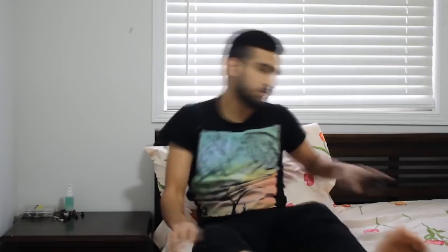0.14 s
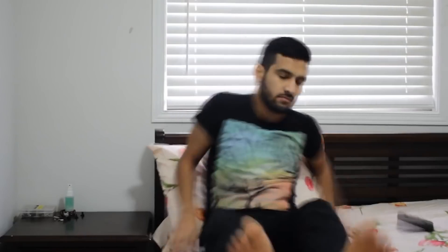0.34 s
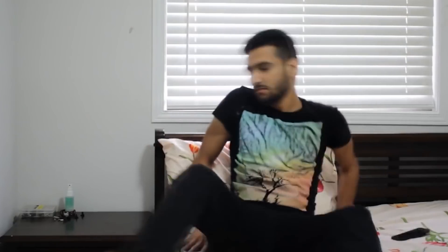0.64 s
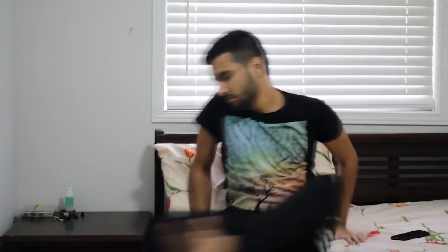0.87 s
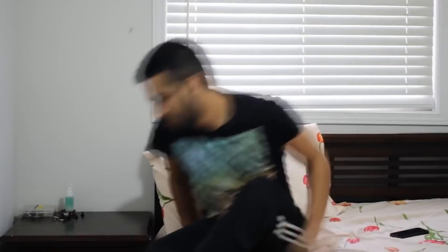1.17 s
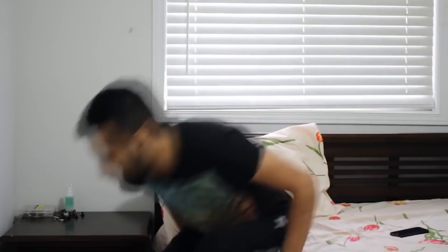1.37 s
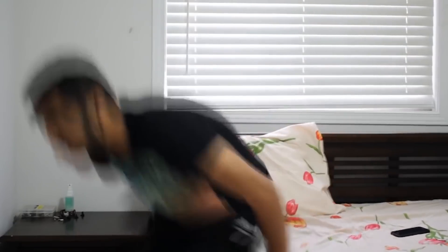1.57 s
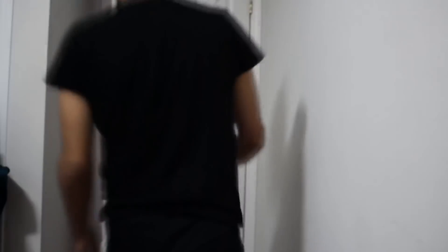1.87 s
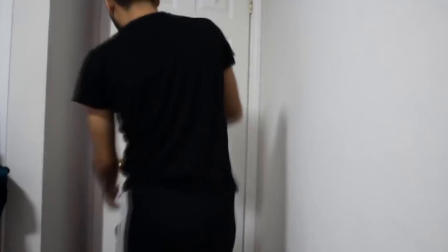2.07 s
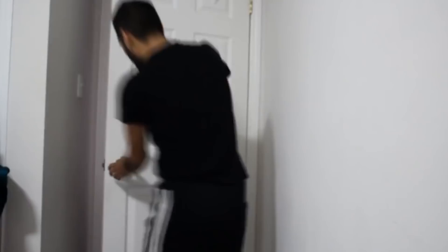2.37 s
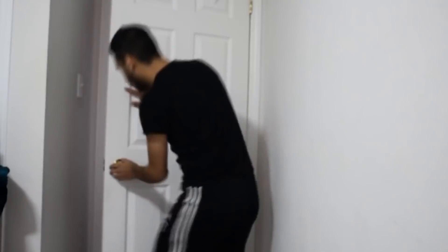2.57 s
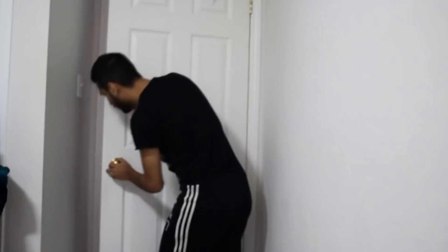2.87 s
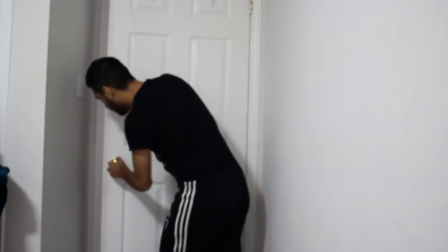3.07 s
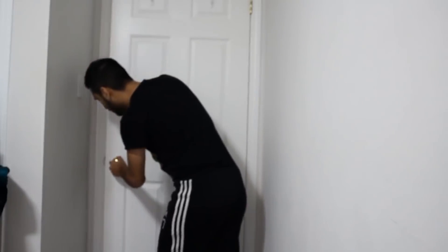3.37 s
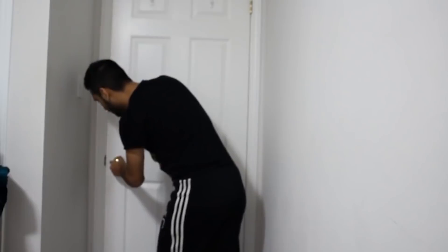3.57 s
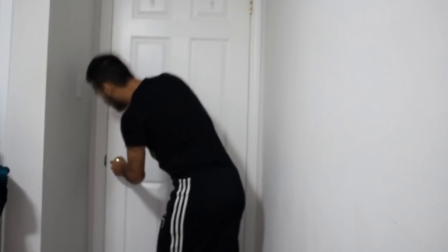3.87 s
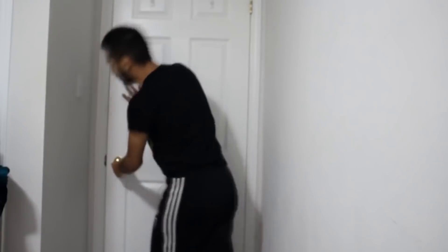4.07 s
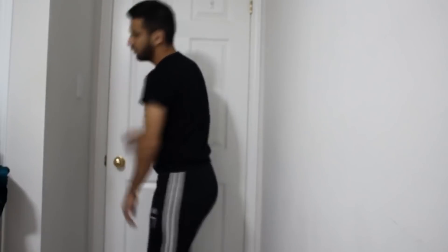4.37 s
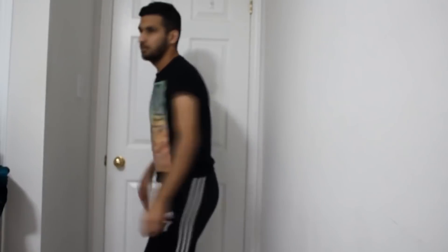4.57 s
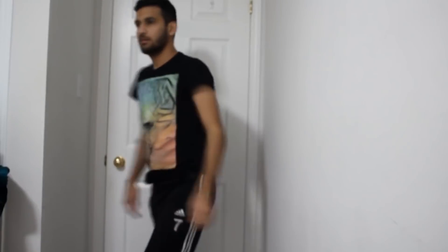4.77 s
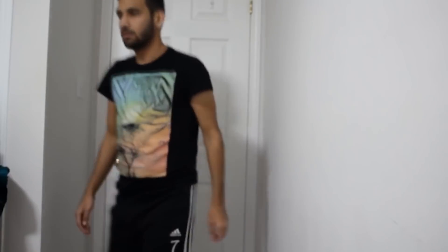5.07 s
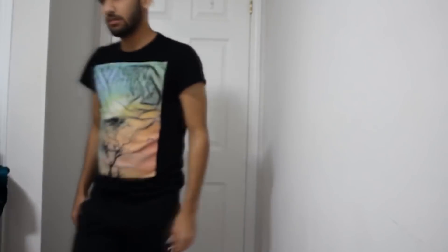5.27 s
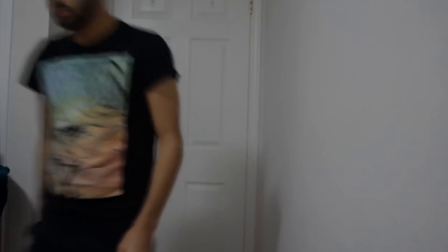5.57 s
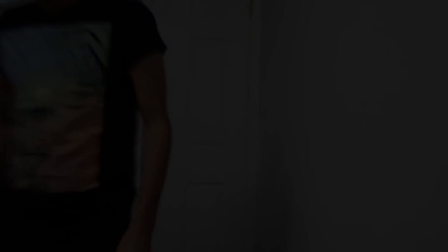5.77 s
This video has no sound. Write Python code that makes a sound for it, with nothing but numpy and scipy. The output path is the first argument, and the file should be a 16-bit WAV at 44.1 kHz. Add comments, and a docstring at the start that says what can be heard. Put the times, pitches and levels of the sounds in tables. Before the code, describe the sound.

Soft bed movements and a muffled bump come first, then a hurried rise with swishing clothes and low thuds of bare feet. A hollow wooden door taps its frame, a palm thuds on it and the bolt snaps. One loud, sharp bang follows, with metal chatter and short room reverberation. Feet scuff back past a creaking board, and a faint click closes it. Indoor, fairly close pickup.

```python
"""Cloth rustles in a quiet bedroom, then a dropped phone thuds on the bed: noise in grains, and noise-band blows.
Someone slides off the bedding (noise carried on a gliding pitch) and walks to a hollow wooden door.
The door is pushed to and the latch clacks; then the door bangs home and its hardware rattles (blows and ringing modes).
Bare feet scuff back across the floor, a board groans on one wavering note, and a light switch clicks."""
import sys
import numpy as np
from scipy import signal
from scipy.fft import rfft, irfft
from scipy.io import wavfile

SR = 44100
rng = np.random.default_rng(int(sys.argv[2]) if len(sys.argv) > 2 else 0)


def digitize_waveform(pressure):
    """Quantize a signal to 16-bit integers and store it at the path in sys.argv[1].

    Rows of a 2-D input are taken as channels; values are limited to [-1, 1].
    """
    field = np.atleast_2d(pressure).T
    bounded = np.clip(field, -1, 1)
    quanta = np.round(bounded * 32767).astype(np.int16)
    wavfile.write(sys.argv[1], SR, quanta)


N = 261858
TIME_S = np.arange(N) / SR
AFTER_S = TIME_S[:int(1.4 * SR)]  # time since a strike
EDGES_HZ = np.geomspace(20, 17000, 25)
CUTOFF_HZ = 15900


def from_db(db):
    """Decibels to gain."""
    return 10 ** (np.asarray(db) / 20)


def rms_one(x):
    """Scale to rms 1."""
    return x / np.sqrt(np.mean(x ** 2) + 1e-30)


def at_hz(points, hz):
    """Read a table on a log-frequency axis."""
    table = np.array(points)
    return np.interp(np.log(hz), np.log(table[:, 0]), table[:, 1])


def add(out, start_s, sound):
    """Mix a sound in at start_s."""
    start = int(start_s * SR)
    out[start:start + len(sound)] += sound[:N - start]


def drift(rate_hz):
    """Smooth chance: normal random knots, rate_hz per second, joined by lines."""
    knots = rng.standard_normal(4096)
    return np.interp(TIME_S * rate_hz, np.arange(len(knots)), knots)


def arch(start_s, length_s):
    """A stroke that rises from 0 to 1 and falls back."""
    return np.sin(np.pi * np.clip((TIME_S - start_s) / length_s, 0, 1))


def decay(t60_s):
    """Exponential fall of 60 dB in t60_s."""
    return np.exp(-np.log(1000) * AFTER_S / t60_s)


def ring(modes):
    """Struck modes: decaying sines, signs alternating."""
    out = 0
    for k, (hz, db, t60_s) in enumerate(modes):
        out = out + (-1) ** k * from_db(db) * decay(t60_s) * np.sin(2 * np.pi * hz * AFTER_S)
    return out


def noise(colour, grain_db, grain_rate_hz):
    """Coloured noise that comes in tiny bursts of uneven level; rms 1."""
    grains = rng.standard_normal(N) * from_db(grain_db * drift(grain_rate_hz))
    hz = np.maximum(np.fft.rfftfreq(N, 1 / SR), 1)
    octaves_below = np.maximum(np.log2(colour[0][0] / hz), 0)
    octaves_above = np.maximum(np.log2(hz / colour[-1][0]), 0)
    gain = from_db(at_hz(colour, hz) - 16 * (octaves_below + octaves_above))
    return rms_one(irfft(rfft(grains) * gain, N))


def bounce(sound, low_hz=600):
    """Nearby surfaces throw back mainly the treble."""
    return signal.sosfilt(signal.butter(2, low_hz, "high", fs=SR, output="sos"), sound)


# Bedroom decay. Each row: frequency in Hz, t60 in s.
ROOM = [(50, 2.17), (150, 0.74), (300, 0.64), (600, 0.53), (1300, 0.49), (3000, 0.35), (7000, 0.42),
        (15000, 0.23)]
# Each band: centre in Hz, width in Hz, filter.
BANDS = [(np.sqrt(lo * hi), hi - lo, signal.butter(2, [lo, hi], "band", fs=SR, output="sos"))
         for lo, hi in zip(EDGES_HZ, EDGES_HZ[1:])]


def blow(colour, attack_s, ring_t60_s, room_db, bass_db=0, treble_db=0):
    """Dense modes of a struck body die fast and the room holds each band longer; rms 1 over the first 50 ms."""
    out = 0
    body = (1 - np.exp(-AFTER_S / max(attack_s, 1e-4))) * decay(ring_t60_s)
    fed = np.cumsum(body ** 2) / np.sum(body ** 2)  # the room fills as the body gives up its energy
    for hz, width_hz, sos in BANDS:
        tail = from_db(room_db) * body.max() * decay(at_hz(ROOM, hz))
        envelope = np.sqrt(body ** 2 + fed * tail ** 2)
        band = signal.sosfilt(sos, rng.standard_normal(len(AFTER_S)) * envelope)
        bass_tilt_db = bass_db * np.clip(np.log2(500 / hz), 0, 3)
        treble_tilt_db = treble_db * np.clip(np.log2(hz / 600), 0, 3)
        band_db = at_hz(colour, hz) + bass_tilt_db + treble_tilt_db
        out = out + rms_one(band) * np.sqrt(width_hz) * from_db(band_db)
    return out / np.sqrt(np.mean(out[:SR // 20] ** 2))


# First bounces off floor, walls and ceiling. Each row: delay in s, level in dB.
WALLS = [(.0029, -26), (.0071, -17.5), (0.0141, -13.5), (0.0186, -11)]


def blows(table, colour, room_db):
    """All the blows on one kind of body, each with its first wall bounces."""
    out = np.zeros(N)
    for start_s, db, bass_db, treble_db, attack_s, ring_t60_s in table:
        hit = blow(colour, attack_s, ring_t60_s, room_db, bass_db, treble_db)
        add(out, start_s, from_db(db - .5) * hit)  # -0.5 dB: overall level of the blows
    thrown = bounce(out)
    for delay_s, wall_db in WALLS:
        add(out, delay_s, from_db(wall_db) * thrown)
    return out


# Air colour. Each row: frequency in Hz, density in dB per Hz.
AIR = [(20, -8), (40, -5.5), (70, -7), (130, -8), (200, -4), (270, -5), (420, -6), (620, -5), (780, -12.5),
       (1500, -13), (2300, -14), (5000, -17.5), (10000, -22.5), (16000, -22.5)]
AIR_DB = -64.5


def still_air():
    """The room's faint, steady broadband noise."""
    return from_db(AIR_DB) * noise(AIR, grain_db=0.6, grain_rate_hz=13)


# Body weight on the floor. Each row: push centre in s, level in dB, push length in s.
WEIGHT = [(0.459, -48, 0.0045), (0.743, -55, 0.017), (0.852, -63, 0.012), (2.04, -31, 0.012),
          (2.526, -54, .012), (3.854, -37, 0.006), (4.697, -53, 0.023), (5.616, -35.5, 0.02)]
# Floor sway modes. Each row: frequency in Hz, level in dB, t60 in s.
JOISTS = [(26.5, -8, 1), (42.8, 5, 0.12), (59, -3.5, 0.38), (78, -2.5, 0.2)]


def floor_sway():
    """A slow push of body weight rocks the joists, and the sway ebbs unevenly."""
    pushes = np.zeros(N)
    for centre_s, db, length_s in WEIGHT:
        push = np.sin(np.pi * np.minimum(AFTER_S / length_s, 1)) ** 2
        add(pushes, centre_s - length_s / 2, from_db(db) * push / push.sum())
    return signal.fftconvolve(pushes, ring(JOISTS))[:N] * from_db(2.6 * drift(41))


# Slips of a floorboard under the turning foot. Each row: start in s, length in s, level in dB.
GROANS = [(4.286, 0.084, -57), (4.355, 0.083, -50)]
GROAN_HZ, GROAN_RISE_HZ = 374, 8  # its note, and how far the load lifts it


def groan():
    """A board slips and sings one slightly unsteady note, louder and higher with the load."""
    load = sum(from_db(db) * arch(start_s, length_s) for start_s, length_s, db in GROANS)
    hz = (GROAN_HZ + GROAN_RISE_HZ * load / load.max()) * (1 + 0.0077 * drift(36))
    return np.sqrt(2) * load * np.sin(2 * np.pi * np.cumsum(hz) / SR)


MOVE_ATTACK_S, MOVE_RELEASE_S = 0.029, 0.034  # linear rise, release time constant


def held(start_s, length_s):
    """A movement's envelope: attack, hold, release."""
    attack = np.clip((TIME_S - start_s) / MOVE_ATTACK_S, 0, 1)
    return attack * np.exp(-np.clip((TIME_S - start_s - length_s) / MOVE_RELEASE_S, 0, 20))


# Body movements that drag bedding or clothes; cloth() scales the levels by layer.
# Each row: start in s, length in s, rubbing in dB, hiss in dB.
MOVES = [(0.023, 0.45, -75, -72.5), (0.426, 0.38, -56, -60), (0.82, 0.4, -61, -62.5),
         (1.35, .16, -56, -62.5), (1.493, 0.12, -50, -58), (1.642, 0.22, -54, -48.5),
         (1.881, 0.24, -51.5, -59), (2.423, .33, -60, -65), (2.978, 0.095, -70, -66),
         (4.212, 0.22, -61.5, -64.5), (5.133, .59, -54.5, -59.5)]
# Rub colour. Each row: frequency in Hz, density in dB per Hz.
RUB = [(25, -2.5), (45, -10.5), (85, -3.5), (150, -3.5), (210, -1.5), (300, -6.5), (470, -1), (700, -4.5),
       (1200, -8), (1800, -13)]
# Hiss and crackle colour. Each row: frequency in Hz, density in dB per Hz.
HISS = [(1000, -6.5), (1450, -5), (1750, -4.5), (2250, -2), (2800, -11), (3500, -6), (4700, -12.5),
        (6000, -17), (7600, -21), (11000, -23.5), (16000, -26)]
# once upright, the clothes never quite rest; levels scaled by layer too
STAND_S, WALK_RUB_DB, WALK_HISS_DB = 1.7, -64, -77.5


def cloth(uneven_db):
    """Fabric gives a lumpy rub, a finer hiss and tiny crackles as folds give way."""
    upright = held(STAND_S, N / SR)
    rub_power = (from_db(WALK_RUB_DB) * upright) ** 2
    hiss_power = (from_db(WALK_HISS_DB) * upright) ** 2
    for start_s, length_s, rub_db, hiss_db in MOVES:
        motion = held(start_s, length_s)
        rub_power = rub_power + (from_db(rub_db) * motion) ** 2
        hiss_power = hiss_power + (from_db(hiss_db) * motion) ** 2
    rub = from_db(-3.5) * noise(RUB, grain_db=1, grain_rate_hz=110)
    hiss = from_db(-1.3) * noise(HISS, grain_db=2.0, grain_rate_hz=120)
    crackle = from_db(-10.0) * noise(HISS, grain_db=4, grain_rate_hz=820)
    fabric = np.sqrt(rub_power) * rub + np.sqrt(hiss_power) * (hiss + crackle)
    return fabric * from_db(uneven_db * drift(18))


# trousers slide over the sheet in one stroke that speeds up and slows down
SLIDE_S, SLIDE_LENGTH_S, SLIDE_DB = .53, 1.0, -65
WEAVE_HZ, WEAVE_RISE_HZ = 3010, 1353  # pitch of the weave at a crawl, and its rise at full speed


def slide(spread):
    """Threads ride over threads at a rate that follows the sliding speed, giving a broad zip."""
    speed = arch(SLIDE_S, SLIDE_LENGTH_S)
    phase = 2 * np.pi * np.cumsum(WEAVE_HZ + WEAVE_RISE_HZ * speed) / SR
    lowpass = signal.butter(1, spread * (WEAVE_HZ + WEAVE_RISE_HZ), fs=SR, output="sos")
    blur = signal.sosfilt(lowpass, rng.standard_normal((2, N)))
    zipping = rms_one(blur[0] * np.cos(phase) + blur[1] * np.sin(phase))
    return from_db(SLIDE_DB + 1.4 * drift(25.5)) * speed * zipping


# Soft things landing on the mattress. Each row: start in s, level in dB, bass in dB per octave,
# treble in dB per octave, attack in s, ring t60 in s.
BED_BUMPS = [(.453, -48, 3.5, 1.5, 0.0056, 0.13), (.502, -49.5, -9, -2.5, 0.0051, 0.13),
             (1.315, -60, -16, 3, 0.0028, 0.046), (1.44, -57.5, -2, -1, .0005, 0.04)]
# Colour of mattress and foot blows. Each row: frequency in Hz, density in dB per Hz.
FOOT = [(24, -45), (40, -25), (178, -2.5), (321, -1), (421, -0.5), (623, -10), (1120, -14.5), (1400, -19),
        (1540, -17), (3220, -36.5), (3820, -35), (5650, -46), (14000, -56)]


def bed_bumps():
    """Soft landings: dull noise blows with a short ring."""
    return blows(BED_BUMPS, FOOT, room_db=-8.5)


# Cloth, soles and the door's edge brushing past. Each row: start in s, level in dB, bass in dB per octave,
# treble in dB per octave, length (t60) in s.
SCUFFS = [(1.62, -47, -3, 7.5, 0.075), (1.644, -42, -2.5, 1.5, .06), (2.489, -56.5, 0.5, 1.5, 0.29),
          (2.769, -56, 7, 5, .09), (3.811, -46.5, 5, -17, 0.54), (4.364, -58, 3, 5, .2),
          (4.561, -49, 2, 2.5, 0.26), (4.671, -49, -5.5, 1.5, 0.17), (5.528, -53.5, -14, 1.5, 0.27)]
# Scuff colour. Each row: frequency in Hz, density in dB per Hz.
SOLE = [(35, -30.5), (60, 2), (118, 0), (250, 4.5), (330, -2.5), (862, 0), (1340, -3.5), (1440, 22),
        (1580, -7.5), (2410, -6.5), (11800, -32.5), (16000, -33)]
SCUFF_ATTACK_S = 0.046


def scuffs():
    """Each brush swells in and dies away over its own length."""
    brushes = [(*brush, SCUFF_ATTACK_S, length_s) for *brush, length_s in SCUFFS]
    return blows(brushes, SOLE, room_db=-9)


# Feet on the floor. Each row: start in s, level in dB, bass in dB per octave, treble in dB per octave,
# attack in s.
FOOTFALLS = [(2.09, -42.5, 3.5, -0.5, .0005), (2.172, -58, -8, -9, .005), (2.356, -53, 4, -17, 0.0033),
             (2.473, -45.5, 5, -3, 0.0007), (2.547, -40.5, 1, 0.5, 0.00044), (2.808, -58.5, 10, -8, .005),
             (5.018, -50, 8.5, 9.5, 0.0059), (5.316, -48.5, -2.5, -4.5, .001),
             (5.606, -50.5, 1.5, 1.5, 0.0026)]
# Floorboards under a heel. Each row: frequency in Hz, level in dB, t60 in s.
BOARDS = [(171, -7, 0.084), (218, 4.5, 0.086), (302, 2, 0.12), (388, -12, .09)]
FOOT_T60_S = 0.15  # the floor rings alike under every step


def footfalls():
    """Each step is a slap of the sole and a short knock of the boards."""
    out = blows([(*step, FOOT_T60_S) for step in FOOTFALLS], FOOT, room_db=-13)
    for start_s, db, *_ in FOOTFALLS:
        add(out, start_s + 0.002, from_db(db - 1.5) * ring(BOARDS))
    return out


# A soft push of the hand on the leaf. Each row: start in s, level in dB, bass in dB per octave,
# treble in dB per octave, attack in s, ring t60 in s.
PALM_PUSH = [(2.933, -44.5, 0, -1.5, .0007, 0.19)]
# Palm colour. Each row: frequency in Hz, density in dB per Hz.
PALM = [(59, -45), (100, -11), (276, -9.5), (403, 2), (779, -20), (839, -10.5), (1160, -9.5), (2000, -25),
        (2360, -41), (2850, -29), (9000, -48), (11700, -78), (19800, -120)]


def palm_push():
    """A hand on the hollow leaf gives a dull thud."""
    return blows(PALM_PUSH, PALM, room_db=-11.5)


# The door meeting its frame. Each row: start in s, level in dB, bass in dB per octave,
# treble in dB per octave, attack in s, ring t60 in s.
DOOR_KNOCKS = [(2.7011, -43, 4, 3.5, 0.00016, 0.076), (2.716, -41, -2, -1.5, 0.00098, 0.19)]
# Wood colour. Each row: frequency in Hz, density in dB per Hz.
WOOD = [(35, -9), (60, -8), (174, -10), (605, 1.5), (727, -12), (895, -7.5), (1490, -14.5), (2650, -13),
        (3840, -24.5), (4840, -26.5), (6840, -39), (15000, -50)]


def door_knocks():
    """The leaf knocks on its frame: short woody noise blows."""
    return blows(DOOR_KNOCKS, WOOD, room_db=-10.5)


# Small mechanisms (latch bolt, light switch). Each row: start in s, level in dB, bass in dB per octave,
# treble in dB per octave, attack in s, ring t60 in s.
CLICKS = [(3.527, -37, -4, 1, 0.0012, 0.048), (3.534, -38.5, 1, -0.5, 0.00048, 0.24),
          (3.837, -48, 10, 0, 0.0037, 0.25), (3.858, -49, -15, -3.5, 0.00097, 0.0623),
          (5.618, -50, 3, 8.5, 0.00015, 0.071)]
# Click colour. Each row: frequency in Hz, density in dB per Hz.
LATCH = [(35, -31.5), (60, -12), (250, -6), (371, -1.5), (553, -12), (651, -6.5), (1010, -28), (1310, -6.5),
         (1510, -15), (1740, -11), (2350, -13.5), (2580, -18), (6580, -28.5), (14200, -32), (16000, -40)]
# Latch and strike plate modes. Each row: frequency in Hz, level in dB, t60 in s.
PLATE = [(1120, -16, 0.11), (1306, -6, 0.17), (1464, -3, 0.036), (1580, 10, 0.03), (1687, -5, 0.186),
         (1740, -15, 0.27), (2026, -8, 0.16), (2478, -3.5, 0.087), (2740, 1.5, 0.039), (3096, -5, 0.104),
         (3410, -3.5, 0.136), (3810, -7.5, 0.14), (4140, -5.5, 0.093), (5260, -17, 0.073)]
# Modes of the bolt snapping into the lock case. Each row: frequency in Hz, level in dB, t60 in s.
BOLT = [(373, -17, 0.37), (452, 0, 0.095), (606, -7.5, 0.7), (1646, 9, 0.061), (1730, 4.5, 0.24),
        (2200, 7, 0.11), (3050, -16, .19), (6401, 4, 0.085)]


def latch_and_switch():
    """The bolt touches its plate, later snaps and sets the lock case ringing; the switch clicks."""
    out = blows(CLICKS, LATCH, room_db=-15)
    add(out, DOOR_KNOCKS[0][0], from_db(-51) * ring(PLATE))
    add(out, CLICKS[1][0], from_db(-45) * ring(BOLT))
    return out


SLAM_S = 3.8617
# Loose knob parts. Each row: frequency in Hz, level in dB, t60 in s.
KNOB = [(3290, -0.5, 0.027), (3535, -3.5, 0.052), (3660, 2.5, 0.027), (3870, -3.5, 0.026),
        (4130, -4.5, 0.019), (4940, -4, 0.036), (5880, -5.5, 0.021)]
# Single ticks of the loose knob. Each row: start in s, level in dB.
KNOB_TICKS = [(3.153, -57.5), (3.913, -42), (3.946, -44), (4.002, -51), (4.063, -54), (4.148, -54.5)]
# the knob chatters from just after the slam, ever weaker, until its parts seat again
CHATTER_DELAY_S, CHATTER_LENGTH_S, CHATTER_DB, CHATTER_FALL_DB_PER_S = 0.034, 0.31, -53.5, 51


def knob_rattle(touches_per_s):
    """Loose metal in the knob chatters unevenly while the leaf shakes: random impulses ring its modes."""
    since_s = TIME_S - SLAM_S - CHATTER_DELAY_S
    level_db = CHATTER_DB - CHATTER_FALL_DB_PER_S * np.maximum(since_s, 0)
    shaking = (since_s > 0) & (since_s < CHATTER_LENGTH_S)
    touches = (rng.random(N) < touches_per_s / SR) * rng.choice([-1, 1], N)
    touches = touches * shaking * from_db(level_db + 2.7 * drift(200))
    for start_s, db in KNOB_TICKS:
        add(touches, start_s, from_db([db]))
    direct = signal.fftconvolve(touches, ring(KNOB))[:N]
    walls = rng.standard_normal(len(AFTER_S)) * decay(at_hz(ROOM, KNOB[0][0]))
    return direct + from_db(-2) * signal.fftconvolve(direct, walls / np.linalg.norm(walls))[:N]


# Latch crack colour. Each row: frequency in Hz, density in dB per Hz.
CRACK = [(120, -35), (200, -7), (548, 1), (1040, -15), (1560, -0.5), (2210, -5.5), (3970, -1.5),
         (5330, -16), (5840, -16), (7830, -15), (13300, -35), (15100, -21), (16000, -32)]
# Leaf boom colour. Each row: frequency in Hz, density in dB per Hz.
BOOM = [(35, -9.5), (80, -8.5), (170, 2), (250, -8.5), (320, -7.5), (400, 0.5), (600, -8.5), (950, -12),
        (1500, -15), (2000, -22), (3800, -25.5), (5000, -27), (6700, -38.5), (15000, -42)]
# Door leaf and low room resonances. Each row: frequency in Hz, level in dB, t60 in s.
LEAF = [(53.6, -23, 1.1), (77.1, 1, 0.63), (100.8, -2, 0.55), (134.3, -4, 0.4), (182, 0.5, 0.86),
        (205, -2.5, 0.83), (245, -2.5, 0.84), (278, -6.5, 0.93), (375, -2, 0.37), (458, 1, 0.17),
        (506, -6.5, 0.68), (583, 3, 0.38), (626, -6.5, 0.87), (680, -15, 0.28)]
# Leaf flexing in its frame. Each row: frequency in Hz, level in dB, t60 in s.
SHUDDER = [(171.7, -5, 0.42), (237, 0, 0.64), (250.6, 7, 0.5), (372, -3, 0.7)]
SHUDDER_S = 3.925


def slam():
    """The latch cracks against its plate, the leaf booms into the room and shudders once more against the frame."""
    out = np.zeros(N)
    crack = blow(CRACK, attack_s=0.00066, ring_t60_s=0.048, room_db=-18.0, bass_db=2.5, treble_db=-0.6)
    add(out, SLAM_S, from_db(-25) * crack)
    # metal on metal: the brightest part is the shortest
    metal = blow(CRACK, attack_s=0.00024, ring_t60_s=0.02, room_db=-36, bass_db=-9, treble_db=-1.5)
    add(out, SLAM_S + .0005, from_db(-31) * metal)
    boom = blow(BOOM, attack_s=0.0011, ring_t60_s=0.078, room_db=-6.5, bass_db=-.5, treble_db=1)
    add(out, SLAM_S + .007, from_db(-26.5) * boom)
    add(out, WALLS[0][0], from_db(-14.5) * bounce(out))  # the wall beside the door combs the treble
    add(out, SLAM_S, from_db(-23.0) * ring(PLATE))
    add(out, SLAM_S, from_db(-34.0) * ring(LEAF) * (1 - np.exp(-AFTER_S / 0.004)))
    add(out, SHUDDER_S, from_db(-35.5) * ring(SHUDDER) * (1 - np.exp(-AFTER_S / 0.019)))
    return out


def scene():
    """Still air of the room, bed, feet and door."""
    bed = bed_bumps() + cloth(uneven_db=0.9) + slide(spread=0.18)
    feet = footfalls() + scuffs() + floor_sway() + groan()
    handling = palm_push() + door_knocks() + latch_and_switch()
    door = handling + knob_rattle(touches_per_s=220) + slam()
    return (still_air() + bed + feet + door)[None]


def record(dry):
    """The loudest peaks are rounded and the top is cut."""
    top = .46
    lowpass = signal.ellip(10, .1, 70, CUTOFF_HZ, fs=SR, output="sos")
    return signal.sosfilt(lowpass, top * np.tanh(dry / top))


dry = scene()
out = record(dry)
digitize_waveform(out)
```